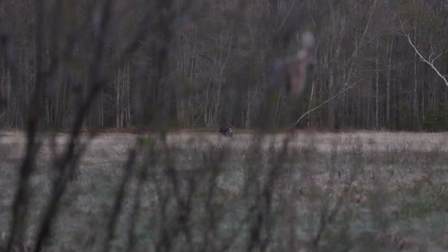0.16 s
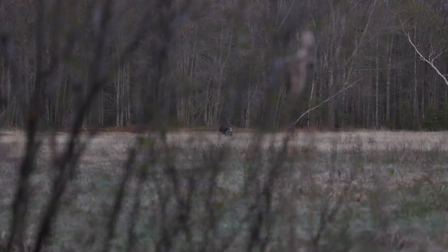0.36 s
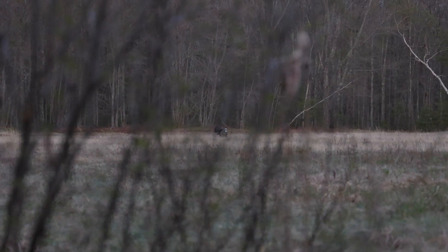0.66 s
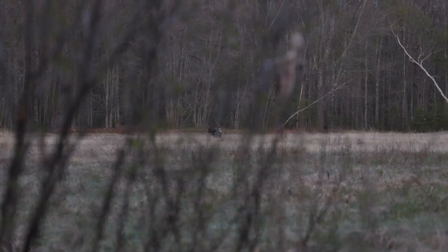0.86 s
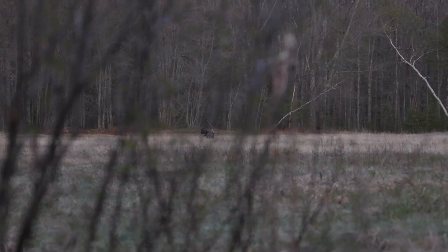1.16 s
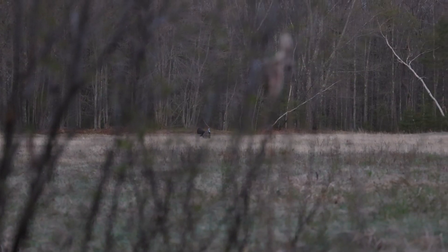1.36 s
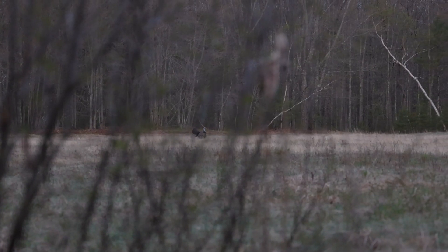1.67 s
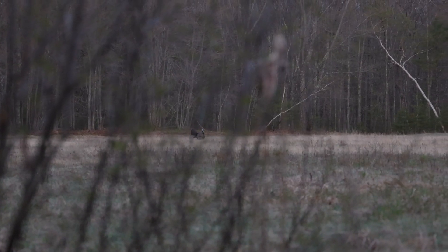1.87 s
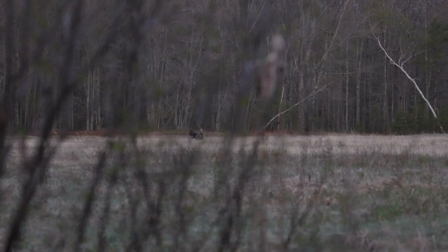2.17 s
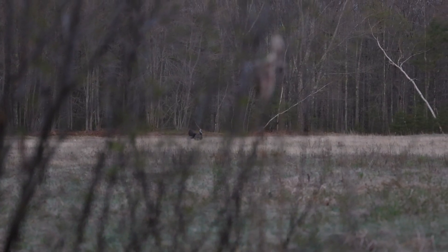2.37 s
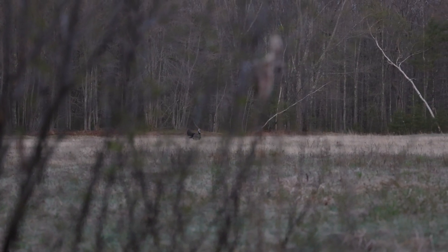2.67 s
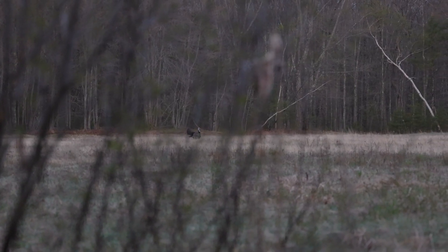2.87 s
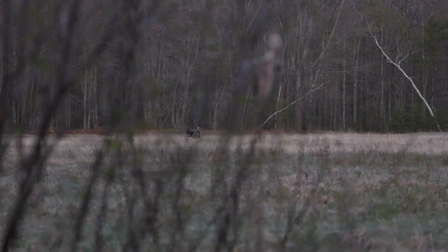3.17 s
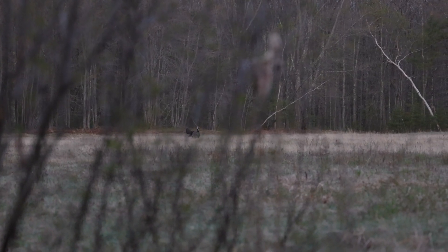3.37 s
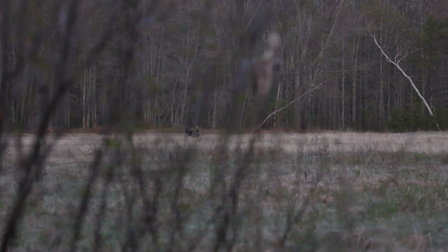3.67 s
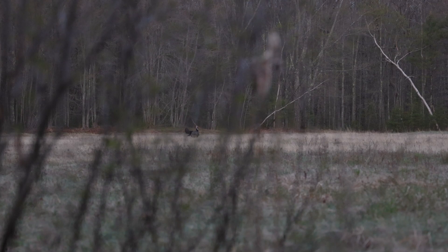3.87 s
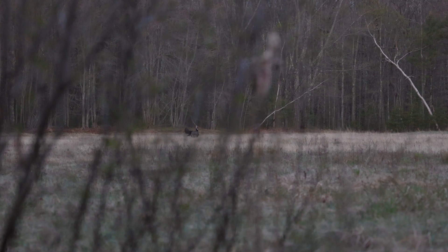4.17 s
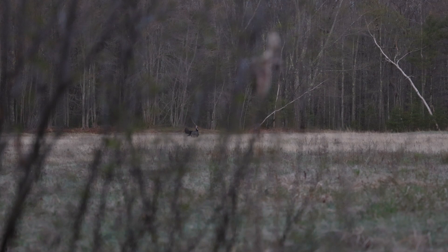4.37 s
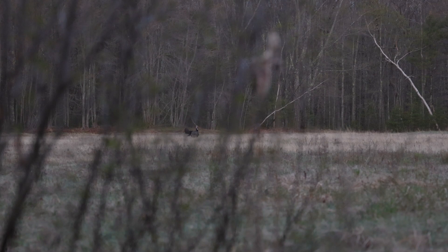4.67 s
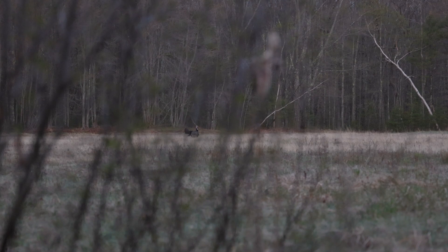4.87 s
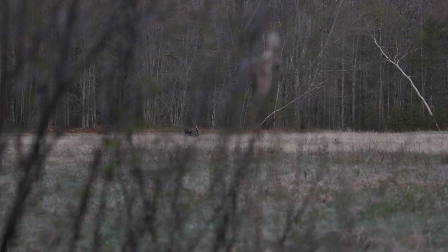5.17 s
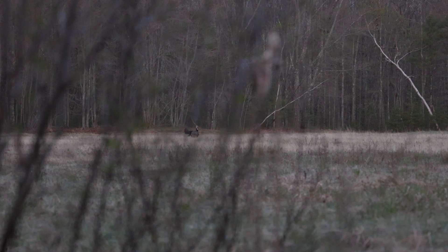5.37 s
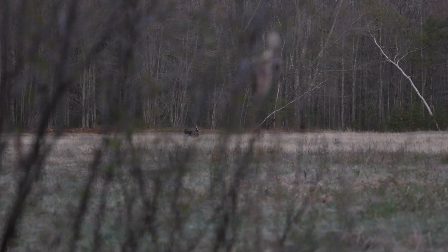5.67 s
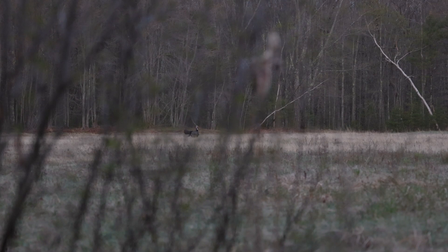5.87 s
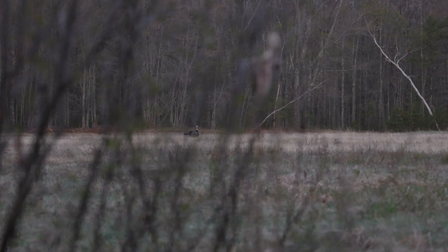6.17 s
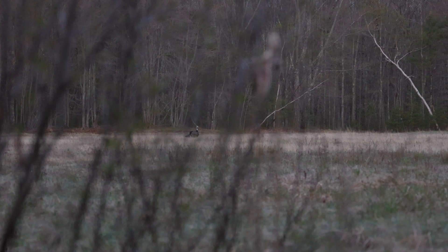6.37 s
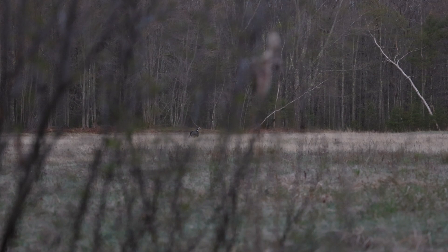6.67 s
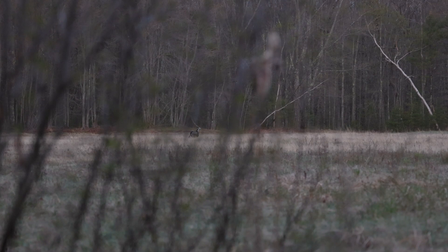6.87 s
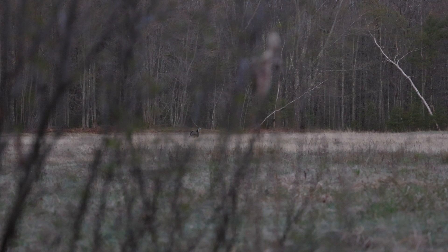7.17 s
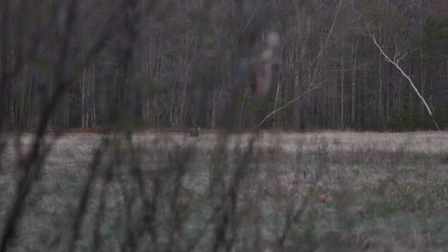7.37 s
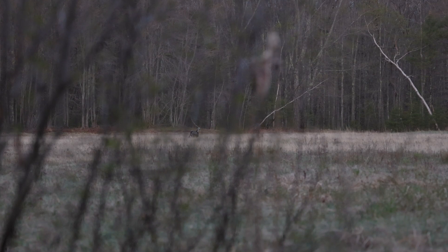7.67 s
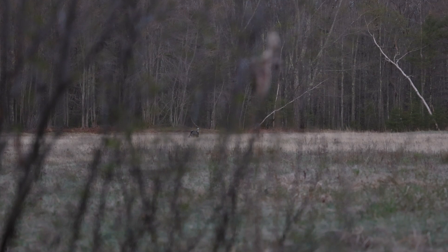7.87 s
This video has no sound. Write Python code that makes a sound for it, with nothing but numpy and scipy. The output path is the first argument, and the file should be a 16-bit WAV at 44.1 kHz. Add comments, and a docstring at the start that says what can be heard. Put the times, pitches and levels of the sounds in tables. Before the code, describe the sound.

Quiet field edge with faint distant birds, then a close sparrow's repeated whistle-and-chip song, a buzz, and a loud turkey gobble echoing off the woods.

```python
"""Wild turkey and song sparrow at the edge of a field

A wild turkey gobbles in yelps and clucks: uneven pulses ring its throat, and the woods return a long, dull echo.
A song sparrow sings close by in gliding sines: one soft whistle-and-chip phrase, later five loud ones,
then a thin high note, a buzz of quick strokes and a last flourish.
Farther birds slur and chirp, dulled or blurred by scatter, over coloured noise for quiet air and a low rumble."""
import sys
import numpy as np
from scipy import signal
from scipy.fft import rfft, irfft, next_fast_len
from scipy.io import wavfile
from scipy.ndimage import uniform_filter1d, map_coordinates

SR = 44100
rng = np.random.default_rng(int(sys.argv[2]) if len(sys.argv) > 2 else 0)


def unload_wav(signal):
    """Save mono or channel-first audio to the path in sys.argv[1] as 16-bit WAV at rate SR, clipped to [-1, 1]."""
    wavfile.write(
        sys.argv[1],
        SR,
        np.round(np.clip(np.atleast_2d(signal).T, -1, 1) * 32767).astype(np.int16),
    )


N = 354123  # samples

# contour of a short chip: time_s from the note's time, pitch_hz, relative_db
CHIP_SHAPE = [(-.012, 3230, -40.5), (-.005, 3704, -14.5), (-.002, 4230, -6.5), (0, 4240, -1),
              (.002, 4730, 3.5), (.003, 5200, -19.5), (.005, 4445, -4), (.0075, 3190, -4)]
# partials of a nearly pure whistle: frequency_multiple, gain_db
PURE_PARTIALS = [(1, 2), (2, -42), (3, -46)]


def turkey():
    """Superposition of paths: two loud yelps and a fading rattle arrive directly, then as scattered echoes."""
    # long syllables: start_s, length_s, mid_pitch_hz, glide_octaves, level_db, throat_hz, rasp_db, roughness
    yelps = [(6.596, .042, 632, .03, -21.7, 1720, -9.5, .22), (6.665, .053, 448, -.28, -16, 1380, -16, .25),
             (6.874, .039, 360, -.05, -25.3, 1120, -4.5, .21),
             (6.916, .052, 485, .08, -29.5, 1600, -2.5, .2), (7.113, .047, 722, .3, -30.5, 1450, 2, .19),
             (7.323, .038, 468, .05, -38, 1800, -4, .21), (7.52, .034, 610, .08, -40.5, 1750, -8, .18),
             (7.725, .033, 612, .05, -43.5, 1740, -6.5, .2)]
    # short low clucks between them: start_s, level_db, throat_hz
    clucks = [(6.75, -37.5, 1450), (6.804, -35.5, 1050), (6.854, -30.5, 1070), (7.004, -38.5, 1450),
              (7.05, -33, 990), (7.192, -45, 1500), (7.242, -37.5, 1370), (7.392, -46, 1480),
              (7.441, -38.5, 1400), (7.586, -49, 1480), (7.631, -46, 1500), (7.792, -49, 1860)]
    # contour of a clean squeak leading into a cluck: time_s from the note's time, pitch_hz, relative_db
    pip_shape = [(-.009, 1650, -10), (0, 1590, 0), (.011, 1540, -7)]
    # the squeaks: time_s, pitch_factor, level_db
    pips = [(6.749, 1, -38), (7.046, 1, -43), (7.187, 1.25, -43), (7.239, 1, -42), (7.395, .98, -46),
            (7.44, 1, -42), (7.582, 1.2, -48), (7.635, .99, -43), (7.784, 1.2, -48)]
    # response of the direct path over the ground: frequency_hz, gain_db
    ground = [(400, -32), (650, -8), (820, -12), (1000, -1), (1150, -1)]
    # colour of the echo from the woods: frequency_hz, gain_db
    woods_colour = [(350, -24), (540, 1.5), (720, 0.5), (1000, 2), (1300, -3.5), (1700, -14.5), (2600, -17),
                    (4200, -11), (7000, -32)]
    cluck_s, cluck_hz, cluck_glide_octaves, cluck_rasp_db = .022, 330, -.1, -1.5

    voice = notes(pip_shape, pips)
    for start_s, *yelp in yelps:
        add(voice, start_s, gobble_note(*yelp))
    for start_s, db, throat_hz in clucks:
        cluck = gobble_note(cluck_s, cluck_hz, cluck_glide_octaves, db, throat_hz, cluck_rasp_db, rough=.23)
        add(voice, start_s, cluck)
    # soft ground swallows the lowest partials on the direct path; the echo from the treetops keeps them
    direct = filtered(voice, colour(ground))
    early_scatter = echo(direct, t60=1.0, swell=0.017, lumpy_db=2)
    woods = filtered(echo(voice, t60=3.14, swell=0.48, lumpy_db=3.5), colour(woods_colour))
    return direct + amp(-19) * early_scatter + amp(-10) * woods


def gobble_note(length, hz, glide, db, throat_hz, rasp_db, rough):
    """Pitch arch and resonance: pitch bends over a glide, and a higher throat resonance is broader."""
    arch_octaves = .17  # by which the ends lie under the middle, apart from the glide
    width_hz = 640 * (throat_hz / 1400) ** 1.6
    hollow_db = -42.5  # the hollow resonance is equally loud in every syllable
    pitches = hz * 2 ** np.array([-glide / 2 - arch_octaves, 0, glide / 2 - arch_octaves])
    return amp(db) * syllable(length, pitches, throat_hz, width_hz, rasp_db, hollow_db - db, rough)


def syllable(length, pitches, throat_hz, width_hz, rasp_db, hollow_db, rough, crest=.54, jitter=0.235,
             breath=0.89, doubling=0.64, high_hz=4500):
    """Source-filter principle: uneven syrinx pulses ring the throat; pitch and effort follow one course."""
    # upper throat resonances, each applied twice: frequency_hz, width_hz, gain_db
    rasp_modes = [(1880, 300, 1), (2215, 780, 2), (2730, 350, 1), (3620, 640, 1.5), (4195, 230, 2)]
    hollow_hz, hollow_width_hz = 780, 380

    size = int(length * SR)
    progress = np.interp(np.linspace(0, 1, size), [0, crest, 1], [0, .5, 1])
    pitch = np.polyval(np.polyfit([0, .5, 1], pitches, 2), progress)
    pitch *= 1 + jitter * rough * wobble(398, size)
    phase = 2 * np.pi * np.cumsum(pitch) / SR
    pulses = unit(sum(np.cos(k * phase) for k in np.arange(1, 17)))
    # a rough voice alternates strong and weak pulses
    pulses *= amp(5.9 * rough * wobble(380, size)) * (1 + doubling * rough * np.cos(phase / 2))
    turbulence = unit(rng.standard_normal(size) * (1 + np.cos(phase)))
    effort = np.sin(np.pi * progress).clip(0) ** .8
    source = (pulses + breath * rough * turbulence) * effort

    def ring(x, response):
        """Free decay: the resonance rings on for up to 10 ms after its source."""
        return filtered(np.pad(x, (0, SR // 100)), response)

    def throat(f):
        """Cascaded resonance with a steep loss of treble."""
        return resonance(f, throat_hz, width_hz) ** 2 / (1 + (f / 2700) ** 10)

    def upper_throat(f):
        """Parallel resonances: their complex responses add."""
        return sum(amp(db) * resonance(f, hz, width) ** 2 for hz, width, db in rasp_modes)

    body = ring(source, throat)
    # the rasp opens only at full effort, and is hoarser than the body
    hoarse_source = (source + 0.88 * turbulence * effort) * effort
    beak = signal.butter(8, high_hz, fs=SR, output="sos")
    rasp = signal.sosfilt(beak, ring(hoarse_source, upper_throat))
    hollow = ring(source, lambda f: resonance(f, hollow_hz, hollow_width_hz) ** 2)
    return 0.6 * (unit(body) + amp(hollow_db) * unit(hollow) + amp(rasp_db) * unit(rasp))


def sparrow():
    """Near-field dominance: the close singer's direct sound outweighs a short shimmer from the brush."""
    # chips outside the phrases: time_s, pitch_factor, level_db
    lone_chips = [(2.53, .98, -60), (4.917, .97, -56), (7.261, 1.024, -25)]
    # contour of one buzz stroke: time_s from the note's time, pitch_hz, relative_db
    sweep_shape = [(-.014, 3914, -14.5), (-.008, 3756, -18), (-.004, 3975, -9.5), (0, 4540, -2.5),
                   (.0025, 4800, -9.5), (.005, 4790, -5), (.009, 5250, -25)]
    # the buzz: start_s, end_s, level_db, attack_s, release_s, sag_db_per_s
    buzz_envelope = (6.895, 7.13, -16.1, .018, .025, 12)
    # partials of the buzz: frequency_multiple, gain_db
    buzz_partials = [(1, 0.5), (2, -46), (2.6, -48), (3, -38.5)]
    # the buzz's soft first sweep: time_s, pitch_hz, level_db
    lead_in = [(6.87, 4600, -51), (6.878, 5060, -38.5), (6.885, 5660, -52.5)]
    # the thin high note: time_s, pitch_hz, level_db
    thin_note = [(6.577, 8700, -72), (6.592, 7950, -47), (6.61, 7510, -35), (6.635, 7447, -31),
                 (6.70, 7500, -33.5), (6.76, 7506, -33), (6.832, 7450, -39.5), (6.842, 7240, -42)]
    # its partials: frequency_multiple, gain_db
    thin_partials = [(1, -0.5), (2, -29.5)]
    # the last flourish: time_s, pitch_hz, level_db
    flourish = [(7.282, 5530, -57), (7.295, 5530, -40), (7.318, 5720, -31), (7.327, 5790, -44),
                (7.354, 5790, -45.5)]
    # its closely spaced partials: frequency_multiple, gain_db
    flourish_partials = [(.93, -10), (1, -0.5), (1.075, -1.5), (1.15, -25.5), (2.075, -19.5), (2.15, -25)]
    # twigs scatter the highest notes most: frequency_hz, gain_db
    brush = [(4600, -3), (7000, 2)]

    song = phrases() + notes(CHIP_SHAPE, lone_chips)
    song += trill(sweep_shape, buzz_envelope, rate=55.45, partials=buzz_partials)
    add(song, thin_note[0][0], whistle(thin_note, thin_partials, waver=0.002))
    add(song, lead_in[0][0], whistle(lead_in))
    add(song, flourish[0][0], whistle(flourish, flourish_partials, waver=0.0061))
    scattered = filtered(song, colour(brush))
    shimmer = amp(-11.5) * echo(scattered, t60=0.23, swell=0.0014)
    late_scatter = amp(-27.5) * echo(scattered, t60=0.9, swell=0.051)
    return song + shimmer + late_scatter


def phrases():
    """Register change: each phrase starts an octave low, swells to a whistle, flicks up and ends in a chip."""
    # phrases: whistle_end_s, whistle_length_s, pitch_hz, whistle_db, undertone_db, chip_db
    phrase_rows = [(1.521, .178, 4565, -38, -61, -37.5), (5.145, .175, 4565, -28.5, -55.5, -23.5),
                   (5.59, .155, 4615, -27.3, -49.5, -22.5), (5.902, .125, 4735, -29, -46, -23),
                   (6.2, .112, 4730, -28.5, -46, -23), (6.471, .113, 4675, -28.5, -46, -23)]
    # partials of the whistle: frequency_multiple, gain_db
    whistle_partials = [(.5, -27.5), (1, 1), (1.5, -46), (2.5, -42), (3, -49)]
    # contours of the low start and the upward flick: time_s from the note's time, pitch_hz, relative_db
    undertone_shape = [(-.03, 2191, -12), (0, 2253, 6.5), (.03, 2300, -4.5), (.06, 2330, -10.5),
                       (.10, 2257, -13)]
    upslur_shape = [(0, 4540, -19), (.002, 5650, -11), (.005, 6450, -8), (.011, 7100, -10), (.02, 7330, -3),
                    (.029, 7680, -5), (.035, 7850, -14)]
    undertone_lag_s, undertone_pitch = .011, .995  # after the whistle's start; pitch factor
    upslur_db, upslur_pitch = -6.3, .98  # relative to the chip; pitch factor
    chip_lag_s, chip_pitch = .0478, .987  # after the whistle's end; pitch factor

    out = np.zeros(N)
    for end, length, hz, whistle_db, undertone_db, chip_db in phrase_rows:
        start = end - length
        add(out, start, amp(whistle_db) * whistle(held_note(length, hz), whistle_partials))
        out += notes(undertone_shape, [(start + undertone_lag_s, undertone_pitch, undertone_db)])
        out += notes(upslur_shape, [(end, upslur_pitch, chip_db + upslur_db)], [(1, 0.5), (2, -30)])
        out += notes(CHIP_SHAPE, [(end + chip_lag_s, chip_pitch, chip_db)])
    return out


def held_note(length, hz):
    """Exponential relaxation of pitch: (s, Hz, dB) rows scoop up and swell, hold, then droop and thin out."""
    scoop, scoop_s, droop, droop_s = .055, .035, .042, .01  # shares of the pitch, time constants
    attack_s, rise_db, release_s, fall_db = .061, 31, .007, 16
    sag_db_per_s = 3
    t = np.linspace(0, length, int(length * SR) // 64)
    pitch = hz * (1 - scoop * np.exp(-t / scoop_s) - droop * np.exp((t - length) / droop_s))
    attack = rise_db * np.maximum(1 - t / attack_s, 0)
    release = fall_db * np.maximum(1 - (length - t) / release_s, 0)
    return np.transpose([t, pitch, -attack - release - sag_db_per_s * (t - length / 2)])


def far_birds():
    """Direct-to-scattered ratio: calls from the woods and chatter from the hedge carry echoes nearly as strong
    as their direct sound, the woods' ringing longer; calls from the field are drier."""
    # note contours, each with time_s from the note's time, pitch_hz, relative_db:
    # long falling whistle, arched whistle, faint low call
    slur_shape = [(-.135, 3200, -14.5), (-.115, 3020, -3), (-.095, 2920, -18), (-.07, 2820, -3),
                  (0, 2574, 1), (.09, 2370, -4), (.2, 2177, -7.5)]
    arch_shape = [(-.09, 4100, -5), (0, 4550, -3), (.09, 4560, -8), (.16, 4260, -5)]
    hoot_shape = [(-.05, 1380, -6), (0, 1320, 0), (.07, 1240, -10)]
    # short fall, short rise, high peep
    fall_shape = [(-.018, 3430, -15.5), (0, 2880, 1), (.012, 2590, -8), (.027, 2230, -20)]
    rise_shape = [(-.02, 2930, -9.5), (0, 3283, -1.5), (.018, 3400, -16.5)]
    peep_shape = [(-.015, 5430, -5), (0, 5510, 3.5), (.06, 5450, -6.5)]
    # falling tick, one stroke of the far buzz
    tick_shape = [(-.006, 6800, -9), (0, 5254, -5), (.008, 3900, 1.5)]
    far_sweep_shape = [(-.013, 3760, -7), (-.007, 3800, -5), (0, 4480, -6.5), (.007, 5080, -6),
                       (.01, 5200, -14)]
    # the notes sung on these shapes, levels ahead of the mix: time_s, pitch_factor, level_db
    slurs = [(.5, 1, -54.5), (1.045, 1, -55.5), (2.79, .89, -61.5), (2.955, 1, -52), (3.479, 0.97, -51),
             (6.309, 0.98, -53.5)]
    arches = [(2.27, 1.02, -65)]
    hoots = [(2.139, 0.97, -63), (2.57, 0.96, -66), (2.95, 0.98, -64), (3.05, 1, -62), (3.6, 0.96, -62)]
    falls = [(.04, 2.35, -67), (.22, 0.98, -57), (3.268, 2.4, -65), (3.565, 2.45, -66), (3.69, 1.45, -44),
             (4.64, 2.35, -65), (4.818, 1.03, -51.5), (5.103, 1.04, -52), (5.39, 1.02, -53),
             (5.69, 1.45, -47.5), (7.207, .93, -43), (7.431, 0.99, -33)]
    rises = [(.365, 1.97, -62.5), (3.2, 0.98, -49), (3.489, 1, -46.5), (3.842, 2.07, -62.5),
             (4.52, .93, -57), (4.965, 1.98, -58.5), (5.245, 1.98, -57), (5.545, 1.84, -61)]
    peeps = [(0.064, 0.96, -64.5), (4.665, 0.96, -65)]
    # trills, levels ahead of the mix: start_s, end_s, level_db, attack_s, release_s, sag_db_per_s
    far_buzz = (3.908, 4.48, -52.3, .025, .08, 4)
    tickings = [(2.845, 4.02, -64, .2, .06, -4), (4.44, 4.88, -60.5, .04, .1, 0)]

    deep = notes(slur_shape, slurs) + notes(arch_shape, arches) + notes(hoot_shape, hoots)
    deep *= amp(2.8 * wobble(25.04, N))  # moving air makes distant notes swell and fade
    chatter = chirp_pairs(count=6) + trill(far_sweep_shape, far_buzz, rate=55.5, scatter=.015)
    chatter += sum(trill(tick_shape, run, rate=21, scatter=.03) for run in tickings)
    calls = notes(fall_shape, falls) + notes(rise_shape, rises) + notes(peep_shape, peeps)
    woods = amp(-4) * deep + amp(-5.5) * echo(deep, t60=1.8, swell=.01)
    hedge = amp(-2.7) * chatter + amp(-3.5) * echo(chatter, t60=0.47, swell=.004)
    field = calls + amp(-9.5) * echo(calls, t60=.6, swell=0.0065)
    return woods + hedge + field


def chirp_pairs(count):
    """Periodic repetition: two quick chirps recur at an even pace and slowly fade."""
    # contour of a quick chirp: time_s from the note's time, pitch_hz, relative_db
    chirp_shape = [(-.016, 4350, -10), (0, 3810, 1), (.014, 3350, -10)]
    first_s, period_s, gap_s = -.04, .292, .048
    start_db, fade_db_per_s = -52, 2.7  # level at time zero, ahead of the mix
    rows = []
    for start in first_s + period_s * np.arange(count):
        db = start_db - fade_db_per_s * start
        rows += [(start, 1.02, db), (start + gap_s, 1, db)]
    return notes(chirp_shape, rows)


def background():
    """Incoherent addition: quiet air, rumble, soft bumps and the wash of a far gobble add as noises."""
    return quiet_air() + rumble() + far_gobble() + bumps()


def quiet_air():
    """Broadband noise: a spectrum falling towards the treble, with a barely moving level."""
    # spectrum of the air: frequency_hz, relative_db
    air_spectrum = [(15, -53.5), (25, -5), (70, -9), (107, -2), (156, -6.5), (247, -10), (498, -9.5),
                    (635, -8.5), (1280, -12.5), (2250, -15.5), (3030, -17), (3380, -16.5), (5340, -25.5),
                    (5790, -27), (15700, -29.5)]
    return amp(-56.8 + 0.13 * wobble(5, N)) * noise(air_spectrum)


def far_gobble():
    """Multiple scattering: the trees smear a far gobble into a wash of noise."""
    # level of the wash, ahead of its random waver: time_s, level_db
    wash_level = [(0, -51), (.45, -51.5), (.7, -49), (1.0, -51), (1.5, -60.5), (2.1, -99)]
    # spectrum of the wash: frequency_hz, relative_db
    wash_spectrum = [(200, -21.5), (450, -10), (620, -6), (920, 4.5), (1300, -5.5), (2000, -11.5),
                     (4200, -18), (5500, -29), (12000, -55)]
    return level(wash_level) * amp(1.0 * wobble(16.15, N)) * noise(wash_spectrum)


def bumps():
    """Band-limited bursts: noise through one broad resonance gives soft bumps, ticks and rustles."""
    # bursts, levels ahead of the fade window: start_s, length_s, centre_hz, level_db
    bump_rows = [(0.131, 0.1, 4000, -57), (0.557, 0.082, 2180, -56.5), (.67, 0.068, 3030, -57.5),
                 (1.45, 0.023, 250, -52), (4.202, .012, 3000, -58), (4.354, .008, 7500, -60),
                 (4.383, .012, 880, -51), (4.409, .011, 1300, -50), (4.705, .005, 2400, -47.5),
                 (5.028, .025, 264, -51.5), (5.252, 0.027, 280, -52), (5.637, 0.02, 248, -49),
                 (6.006, .008, 8500, -57), (6.426, .025, 229.3, -52.5)]
    out = np.zeros(N)
    for start_s, length, hz, db in bump_rows:
        size = int(length * SR)
        burst = unit(filtered(rng.standard_normal(size), lambda f: resonance(f, hz, hz)))
        add(out, start_s, amp(db) * np.hanning(size) * burst)
    return out


def rumble():
    """Power addition: low noise rests at one level, and the powers of its swells add to it."""
    # swells, levels ahead of the common gain: start_s, length_s, level_db
    swells = [(-.05, .6, -60), (.56, .11, -53.5), (.7, .9, -64), (4.25, .2, -63), (6.59, .32, -53),
              (6.6, 1.2, -55)]
    # spectrum of the rumble: frequency_hz, relative_db
    rumble_spectrum = [(30, -24), (55, -11.5), (72, 2.5), (90, -10), (150, -14), (260, -26), (500, -53.5)]
    attack_s, release_s = .04, .1
    t = np.arange(N) / SR
    power = amp(-65.5) ** 2  # resting level, ahead of the common gain
    for start_s, length, db in swells:
        rising = (t - start_s) / attack_s
        falling = 1 - (t - start_s - length) / release_s
        opening = np.clip(np.minimum(rising, falling), 0, 1)
        power = power + (amp(db) * opening) ** 2
    return amp(1.5) * np.sqrt(power) * noise(rumble_spectrum)


def whistle(contour, partials=PURE_PARTIALS, waver=0.0023):
    """Frequency modulation: a syrinx tone follows (s, Hz, dB) rows with rounded corners."""
    s, hz, db = np.transpose(contour)
    t = np.arange(s[0], s[-1], 1 / SR)

    def glide(values):
        """Moving average: it rounds the corners of a piecewise-linear course."""
        return uniform_filter1d(np.interp(t, s, values), size=40)

    pitch = glide(hz) * (1 + waver * wobble(147.3, len(t)))
    phase = 2 * np.pi * np.cumsum(pitch) / SR
    # partials above half the sample rate are left out
    tone = sum(amp(gain_db) * np.sin(k * phase) * (k * pitch < SR / 2) for k, gain_db in partials)
    nearest_end_s = np.minimum(t - s[0], s[-1] - t)
    edges = np.sin(np.pi / 2 * np.minimum(nearest_end_s / .002, 1)) ** 2
    return np.sqrt(2) * tone * amp(glide(db)) * edges


def notes(shape, rows, partials=PURE_PARTIALS):
    """Transposition: one note shape is sung at each (s, pitch factor, dB)."""
    out = np.zeros(N)
    for s, factor, db in rows:
        note = whistle(np.array(shape) * [1, factor, 1], partials)
        add(out, s + shape[0][0], amp(db) * note)
    return out


def trill(shape, envelope, rate, partials=PURE_PARTIALS, scatter=.008):
    """Rapid repetition: one note shape recurs at a rate per second, fades in, sags and fades out."""
    edge_db = 9.5  # depth of the fade at either end
    start, end, db, attack, release, sag = envelope
    times = np.arange(start, end, 1 / rate)
    opening = np.minimum(np.minimum((times - start) / attack, (end - times) / release), 1)
    levels = db - sag * (times - start) - edge_db * (1 - opening)
    pitch_factors = 1 + scatter * rng.standard_normal(len(times))
    return notes(shape, zip(times, pitch_factors, levels), partials)


def echo(x, t60, swell, lumpy_db=0):
    """Diffuse scatter from countless stems and trunks: it builds up, then dies away in uneven clumps."""
    t = np.arange(2 * SR) / SR
    clumps = amp(lumpy_db * wobble(45.4, len(t)))
    decay = amp(-60 * t / t60)
    build_up = 1 - np.exp(-(t / swell) ** 2)
    tail = rng.standard_normal(len(t)) * clumps * decay * build_up
    return signal.fftconvolve(x, tail / np.linalg.norm(tail))[:N]


def resonance(f, hz, width):
    """Damped oscillator: a band-pass response with gain 1 at its centre."""
    return 1j * f * width / (hz * hz - f * f + 1j * f * width)


def filtered(x, response):
    """Linear filtering: the spectrum of x times a complex response of frequency."""
    size = next_fast_len(len(x) + 8192)
    return irfft(rfft(x, size) * response(np.fft.rfftfreq(size, 1 / SR)), size)[:len(x)]


def colour(points):
    """Spectral envelope: the response through (Hz, dB) points on a log axis."""
    hz, db = np.transpose(points)
    return lambda f: amp(np.interp(np.log(f + 1), np.log(hz), db))


def noise(spectrum):
    """Spectral shaping: white noise is coloured and brought to rms 1."""
    return unit(filtered(rng.standard_normal(N), colour(spectrum)))


def wobble(rate, size):
    """Band-limited fluctuation: a smooth random curve with rate knots a second."""
    knots = rng.standard_normal(int(size * rate / SR) + 4)
    return map_coordinates(knots, [np.arange(size) * rate / SR])


def level(rows):
    """Amplitude envelope: gain per sample, linear in dB between (s, dB) rows."""
    return amp(np.interp(np.arange(N) / SR, *np.transpose(rows)))


def amp(db):
    """Decibel law: 20 dB is a factor of ten in amplitude."""
    return 10 ** (np.asarray(db) / 20)


def unit(x):
    """Normalisation to an rms of 1."""
    return x / np.sqrt(np.mean(x ** 2) + 1e-20)


def add(track, s, x):
    """Superposition: x is mixed into the track at time s."""
    start = round(s * SR)
    x = x[max(-start, 0):max(N - start, 0)]
    track[max(start, 0):][:len(x)] += x


def scene():
    """Superposition of all sources in one channel."""
    return (turkey() + sparrow() + far_birds() + background())[None]


def record(dry):
    """Band limitation: nothing at or above 15.8 kHz is kept."""
    top_hz = 15800
    return np.array([filtered(channel, lambda f: f < top_hz) for channel in dry])


dry = scene()
out = record(dry)
unload_wav(out)
```